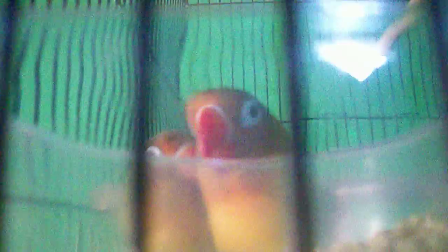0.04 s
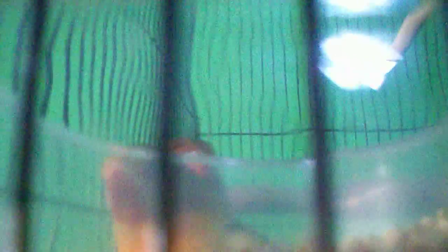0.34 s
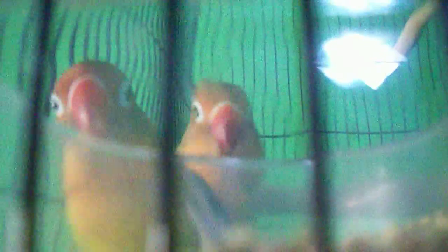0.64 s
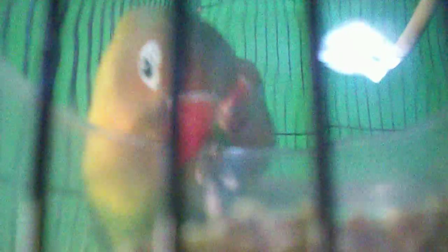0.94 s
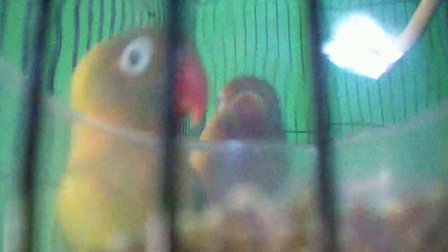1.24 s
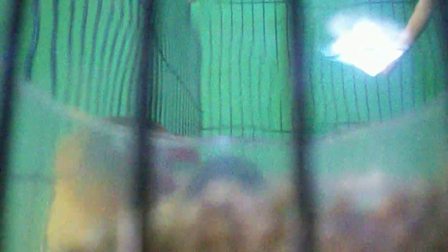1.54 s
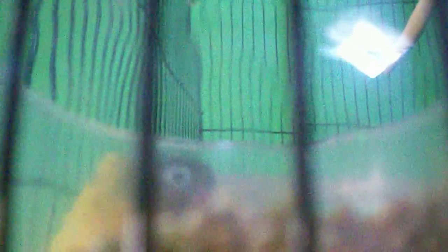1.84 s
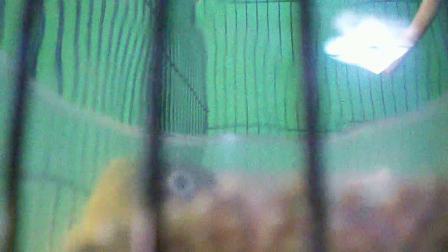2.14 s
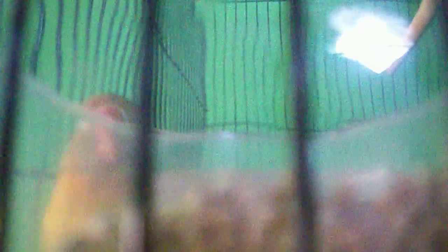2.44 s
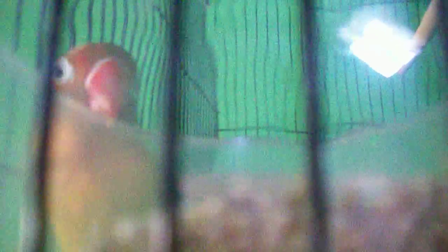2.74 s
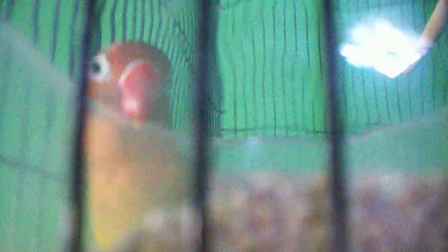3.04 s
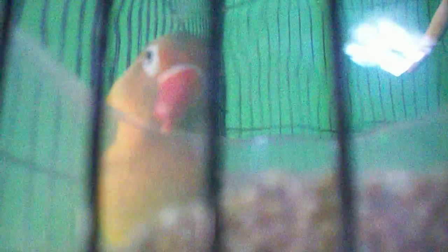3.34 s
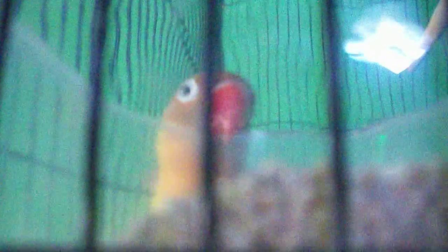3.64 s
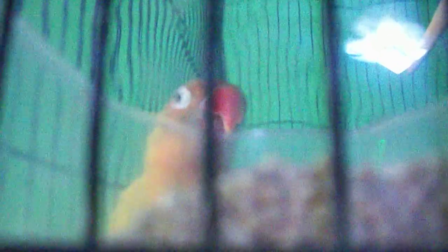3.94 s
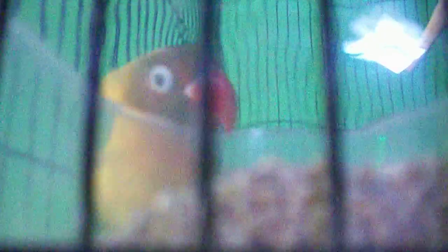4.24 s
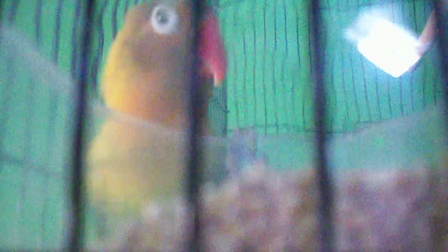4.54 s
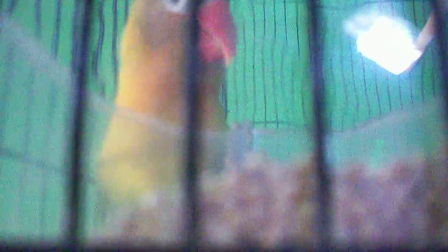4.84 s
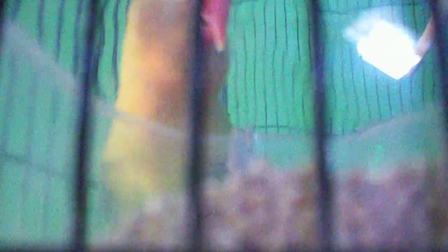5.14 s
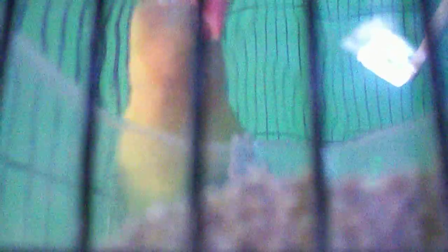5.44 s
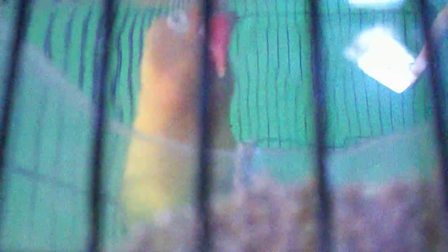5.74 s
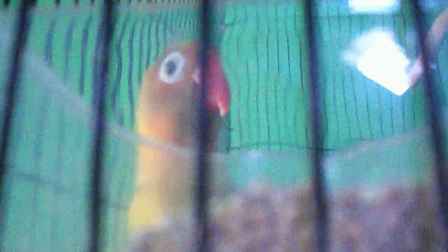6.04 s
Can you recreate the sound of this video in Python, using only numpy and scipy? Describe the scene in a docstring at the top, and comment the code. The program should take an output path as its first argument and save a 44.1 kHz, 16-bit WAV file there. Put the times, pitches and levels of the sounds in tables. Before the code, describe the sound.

Small caged parrots give shrill, falling chirps and crack seed husks close by, over a low throbbing fan hum.

```python
"""Lovebirds feeding in a wire cage

Close up, in a small hard-walled room. Shrill chirps, the second harmonic of the syrinx, leap up
and slide down; one squeak sounds at the bars, softer peeps further back. Beaks crack and nibble
husks, which ring briefly; seed, feet and feathers make friction noise.
Underneath, a fan throbs and hums, and dull rumbles swell and pass."""
import sys
import numpy as np
from scipy import signal
from scipy.fft import rfft, irfft
from scipy.io import wavfile
from scipy.ndimage import uniform_filter1d

SR = 44100
rng = np.random.default_rng(int(sys.argv[2]) if len(sys.argv) > 2 else 0)


def dump(signal):
    """Clip the signal to [-1, 1] and save it as 16-bit WAV at the path in sys.argv[1]."""
    limited = np.clip(np.atleast_2d(signal).T, -1, 1)
    pcm = np.round(limited * 32767).astype(np.int16)
    wavfile.write(sys.argv[1], SR, pcm)


N = 268128
T = np.arange(N) / SR

# echoes off cage and dish: delay/s, relative level/dB
CAGE_ECHOES = [(.00132, -28.5), (.0047, -8.5), (.0083, -6.5)]
# room air spectrum: f/Hz, relative density/dB
AIR_SPECTRUM = [(22, -21.5), (38, -4), (56, -14), (75, -11), (134, -18.5), (232, -29), (350, -29.5),
                (420, -33), (1200, -42.5), (3770, -42.5), (6100, -49), (7490, -61), (8400, -64.5),
                (9000, -78.5), (11700, -101), (19800, -120)]
# fan throb envelope: t/s, level/dB
THROB_LEVELS = [(0.0, -29.5), (0.12, -31), (0.9, -36), (3.06, -29.5), (4.54, -30), (5.32, -37), (5.33, -31),
                (6.08, -37.5)]
# fan throb partials: multiple of the throb rate, relative level/dB
THROB_PARTIALS = [(1, 5), (1.902, -15.5)]
# low swells: t/s, length/s, centre/Hz, width/Hz, level/dB
RUMBLE_SWELLS = [(0, 0.79, 311, 68, -59.5), (0.681, 0.61, 49.7, 5, -42.5),
                 (4.683, 0.77, 101.2, 13.4, -48.5), (5.207, 1, 45.7, 6.6, -42)]
# how busy the birds are: t/s, relative level/dB
ACTIVITY = [(0.0, -65.5), (0.34, -71), (0.66, -71.5), (0.98, -69.5), (1.3, -68), (1.61, -79), (1.81, -72),
            (1.96, -72.5), (2.57, -70), (2.81, -80), (3.33, -71), (3.57, -69), (3.94, -75.5), (4.18, -74.5),
            (4.27, -71.5), (5.18, -77.5), (5.52, -69.5), (6.08, -74.5)]
# feather and husk rustle spectrum: f/Hz, relative density/dB
RUSTLE_SPECTRUM = [(1500, -4), (3000, -12), (4500, -1.5), (6800, -1), (7800, -3), (9000, -22)]
# stirs of seed and feet: t/s, t60/s, centre/Hz, level/dB
SEED_SCUFFS = [(.071, 1, 1520, -61.5), (1.312, 0.82, 1350, -55.5), (1.79, 0.16, 810, -57),
               (2.649, 0.73, 860, -50.5), (2.649, 0.44, 220, -48.5), (2.815, 0.082, 298, -42),
               (3.331, 0.9, 2320, -59), (3.517, .33, 4060, -49.5), (3.586, 1, 1530, -56),
               (3.62, 1, 600, -55.5), (3.72, 0.26, 1700, -54.5), (4.606, 0.74, 720, -47),
               (4.607, 1, 2120, -54.5), (4.8, .17, 1000, -52), (4.899, 0.2, 4100, -52),
               (5.328, 0.27, 1590, -51.5), (5.49, 0.71, 1970, -51), (6.024, 0.092, 1700, -50.5)]
# feather flicks: t/s, t60/s, level/dB
FEATHER_FLICKS = [(.217, .15, -46), (0.404, .15, -56), (.542, 0.24, -48), (0.644, 0.37, -54.5),
                  (1.42, 0.24, -48), (1.55, 0.1, -43.5), (2.023, 0.56, -51.5), (2.967, 0.71, -53),
                  (3.43, 0.15, -51), (4.142, 0.51, -49.5), (5.764, .17, -45.5), (5.946, 1, -48.5)]
# husk modes: f/Hz, t60/s, relative level/dB
HUSK_MODES = [(2805, 0.0048, -4), (3650, 0.0052, -7), (3970, 0.021, -14), (4970, 0.011, -2.5),
              (6200, 0.0099, 0), (7080, 0.0017, 7), (7880, 0.005, -1)]
# beak and perch modes: multiple of the knock pitch, t60/s, relative level/dB
BEAK_MODES = [(.56, 0.0049, -1), (0.798, 0.02, 0), (1.002, 0.018, 5.5), (1.399, 0.013, 1)]
# husks cracking: t/s, knock pitch/Hz, knock level/dB, snap level/dB
SEED_CRACKS = [(0.0665, 1680, -26.5, -29.5), (0.1068, 1720, -39, -49), (.1445, 1490, -38, -38),
               (0.721, 1720, -49, -34.5), (1.248, 1720, -32, -23.5), (1.3103, 1290, -28.5, -21.5),
               (1.331, 1540, -38, -28.5), (2.714, 1805, -25, -14), (2.7628, 1623, -37, -35),
               (2.8177, 1490, -36.5, -29), (3.262, 1280, -40, -33), (3.586, 1830, -35, -32),
               (3.77, 1700, -40.5, -48.5), (4.1846, 1820, -30.5, -19.5), (4.257, 1750, -42.5, -47),
               (4.421, 1700, -44, -37.5), (5.9489, 1730, -33.5, -32.5), (6.052, 1700, -50, -29.5)]
# distant peeps: t/s, length/s, start pitch/Hz, level/dB
PEEP_CALLS = [(0.217, 0.028, 6400, -48.5), (.409, 0.01, 6980, -47), (0.542, 0.018, 6200, -48),
              (1.842, 0.36, 5940, -64.5), (2.301, 0.011, 3300, -50.5), (2.639, 0.036, 6810, -48),
              (3.069, 0.049, 5800, -53.5), (3.279, 0.023, 6280, -45.5), (3.49, 0.059, 5600, -53.5),
              (3.641, 0.04, 4900, -59), (3.874, 0.14, 5790, -62), (4.879, 0.035, 5050, -57),
              (4.901, 0.011, 7400, -50), (5.226, 0.033, 6070, -42.5), (5.521, 0.051, 6500, -47),
              (5.781, .06, 7200, -48), (5.831, 0.037, 6400, -47.5)]
# two joined squeak notes: t/s, length/s, start pitch/Hz, end pitch/Hz, level/dB
SQUEAK_NOTES = [(2.082, 0.009, 3274, 3860, -22), (2.0887, 0.018, 3485, 3350, -23)]
# chirps: t/s, time to slide/s, slide/s, top/Hz, end/Hz, level/dB, pre-slide gain/dB, slide fade/dB
CHIRP_CALLS = [(0.79, 0.031, 0.1, 6765, 3586, -33, -8, -19),
               (1.045, 0.013, 0.07, 7230, 3945, -31, -5, -17.5),
               (2.336, .025, .153, 6650, 3358, -27, -8, -20.5),
               (4.148, 0.024, 0.039, 5355, 4080, -38, 0, -10),
               (4.175, .018, 0.079, 6990, 4130, -28, -1, -20.5),
               (5.323, 0.015, 0.072, 6834, 3520, -25, -6, -22.5),
               (5.624, .022, 0.12, 6930, 3500, -25.5, -4, -20.5)]


def undb(db):
    """Decibels to gain."""
    return 10 ** (np.asarray(db) / 20)


def unit(x):
    """Scale to rms 1."""
    return x / np.sqrt(np.mean(x ** 2))


def decay(t, t60_s):
    """Exponential fall, 60 dB in t60_s."""
    return np.exp(-np.log(1000) * t / t60_s)


def curve(rows):
    """Straight lines through (t/s, value) points."""
    times_s, values = np.transpose(rows)
    return np.interp(T, times_s, values)


def walk(rate_hz):
    """Smooth random drift, rms 1."""
    span = int(SR / rate_hz)
    return unit(uniform_filter1d(uniform_filter1d(rng.standard_normal(N), span), span))


def add(out, start_s, x):
    """Mix x in at start_s."""
    i = int(start_s * SR)
    out[i:i + len(x)] += x[:max(N - i, 0)]


def coloured_noise(spectrum):
    """Noise shaped by (f/Hz, level/dB) points, rms 1."""
    hz, db = np.transpose(spectrum)
    bins_hz = np.maximum(np.fft.rfftfreq(N, 1 / SR), 1)
    gain = undb(np.interp(np.log(bins_hz), np.log(hz), db))
    return unit(irfft(rfft(rng.standard_normal(N)) * gain, N))


def band_noise(size, hz, width_hz):
    """Noise passed twice through one resonance, rms 1."""
    b, a = signal.iirpeak(hz, hz / width_hz, fs=SR)
    return unit(signal.lfilter(b, a, signal.lfilter(b, a, rng.standard_normal(size))))


def friction(t60_s, hz, width_hz, attack_s=0.0012):
    """Rubbing noise: fast attack, exponential decay."""
    t = T[:SR // 2]
    return band_noise(len(t), hz, width_hz) * (1 - np.exp(-t / attack_s)) * decay(t, t60_s)


def strike(force, modes, detune):
    """A force rings randomly detuned modes; peak 1."""
    t = T[:len(force)]
    hz, t60_s, db = np.transpose(modes)
    tuned_hz = hz * (1 + detune * rng.uniform(-0.96, 1, len(hz)))
    gains = undb(db) * (-1) ** np.arange(len(hz))
    ring = gains @ (np.sin(2 * np.pi * np.outer(tuned_hz, t)) * decay(t, t60_s[:, None]))
    sound = signal.fftconvolve(force, ring)[:len(t)]
    return sound / np.abs(sound).max()


def room(x, t60_s=0.46, first_s=0.0046, build_s=0.0038):
    """Dense wall echoes build up and fade; unit energy."""
    t = T[:SR * 3 // 4]
    build = np.clip((t - first_s) / build_s, 0, 1)
    tail = rng.standard_normal(len(t)) * build * decay(t, t60_s)
    return signal.fftconvolve(x, tail / np.linalg.norm(tail))[:N]


def cage(x):
    """Direct sound plus near echoes, which beat against a sliding whistle."""
    return x + sum(undb(db) * np.interp(T - delay_s, T, x, left=0) for delay_s, db in CAGE_ECHOES)


def fan(throb_hz=21.9, hum_hz=69, hum_db=-66, air_db=-45.5, drift=0.0113, flutter_db=0.5, waver_db=5):
    """Throb and hum drift with the fan's speed, over steady room air."""
    rad_per_hz = 2 * np.pi * np.cumsum(1 + drift * walk(4.9)) / SR
    throb = unit(sum(undb(db) * np.sin(k * throb_hz * rad_per_hz) for k, db in THROB_PARTIALS))
    hum = unit(np.sin(hum_hz * rad_per_hz) * undb(waver_db * walk(1.9)))
    air = coloured_noise(AIR_SPECTRUM)
    throb_db = curve(THROB_LEVELS) + flutter_db * walk(11)
    return throb * undb(throb_db) + hum * undb(hum_db) + air * undb(air_db)


def rumbles():
    """Low swells of noise somewhere in the house."""
    out = np.zeros(N)
    for start_s, length_s, hz, width_hz, db in RUMBLE_SWELLS:
        size = int(length_s * SR)
        add(out, start_s, undb(db) * band_noise(size, hz, width_hz) * np.sqrt(np.hanning(size)))
    return out


def rustle(gain_db=14, flutter_db=1.2):
    """Fine hiss of feathers and husks, following the birds' activity."""
    return coloured_noise(RUSTLE_SPECTRUM) * undb(curve(ACTIVITY) + gain_db + flutter_db * walk(32))


def scuffs(relative_width=0.82, grain_db=2.0):
    """Grainy friction of seed and feet; bright flicks of feathers."""
    out = np.zeros(N)
    for start_s, t60_s, hz, db in SEED_SCUFFS:
        add(out, start_s, undb(db) * friction(t60_s, hz, relative_width * hz))
    for start_s, t60_s, db in FEATHER_FLICKS:
        add(out, start_s, undb(db) * friction(t60_s, hz=7010, width_hz=2000))
    return out * unit(undb(grain_db * walk(150)))


def nibbles(rate_hz=11, gain_db=31, range_db=5):
    """Faint random beak ticks on husks, louder when the birds are busy."""
    out, blow = np.zeros(N), signal.unit_impulse(SR // 50)
    for when, size in rng.random((int(rate_hz * T[-1]), 2)):
        tick = strike(blow, HUSK_MODES, detune=0.05)
        add(out, when * T[-1], undb(gain_db + range_db * size) * tick)
    return out * undb(curve(ACTIVITY))


def cracks(splinter_db=-19, splinter_s=0.0024):
    """One blow knocks the beak while the husk snaps and splinters."""
    out, t = np.zeros(N), T[:SR // 25]
    blow = signal.unit_impulse(len(t))
    for start_s, knock_hz, knock_db, snap_db in SEED_CRACKS:
        splinters = undb(splinter_db) * rng.standard_normal(len(t)) * np.exp(-t / splinter_s)
        beak = [(multiple * knock_hz, t60_s, db) for multiple, t60_s, db in BEAK_MODES]
        add(out, start_s, undb(knock_db) * strike(blow, beak, detune=0.068))
        add(out, start_s, undb(snap_db) * strike(blow + splinters, HUSK_MODES, detune=0.084))
    return out


def peeps(fall_oct_per_s=13.0, max_fall_oct=0.71, waver=0.05, flutter_db=5.0):
    """Hoarse falling whistles; longer ones fall further, up to a limit."""
    out, wobble, flutter = np.zeros(N), 1 + waver * walk(600), undb(flutter_db * walk(350))
    for start_s, length_s, start_hz, db in PEEP_CALLS:
        progress = np.linspace(0, 1, int(length_s * SR))
        fall_oct = min(fall_oct_per_s * length_s, max_fall_oct)
        hz = start_hz * 2 ** (-fall_oct * progress) * wobble[int(start_s * SR):][:len(progress)]
        envelope = np.sqrt(np.minimum(1, 8 * progress) * (1 - progress))
        add(out, start_s, undb(db) * np.sqrt(2) * envelope * np.sin(2 * np.pi * np.cumsum(hz) / SR))
    return out * flutter


def squeak(second_db=-2, third_db=-30, attack_share=0.25, release_share=0.31):
    """Two clean notes, up then down, with a strong octave."""
    out = np.zeros(N)
    for start_s, length_s, start_hz, end_hz, db in SQUEAK_NOTES:
        progress = np.linspace(0, 1, int(length_s * SR))
        phase = 2 * np.pi * np.cumsum(start_hz + (end_hz - start_hz) * progress) / SR
        tone = np.sin(phase) + undb(second_db) * np.sin(2 * phase) + undb(third_db) * np.sin(3 * phase)
        envelope = np.clip(np.minimum(progress / attack_share, (1 - progress) / release_share), 0, 1)
        add(out, start_s, undb(db) * tone * envelope)
    return out


def chirps(waver=0.018, flutter_db=3.5, rasp_rad=0.0425, fundamental_db=-46.5, third_db=-42):
    """The syrinx leaps, holds, then slides down in steps; the beak passes its second harmonic."""
    leap_s, leap_from, onset_db = 0.012, 0.53, -9
    edge_s, swell_s = 0.003, 0.0021
    step_hz, step_depth, step_dip_db = 50.3, 0.8, -2.5
    bend, even_fade_s = 2.05, 0.086  # pitch falls fast at first; shorter slides fade earlier
    out, wobble, flicker_db = np.zeros(N), 1 + waver * walk(380), flutter_db * walk(150)
    jitter_rad = rasp_rad * walk(1400)
    longest_s = max(row[2] for row in CHIRP_CALLS)
    for start_s, hold_s, slide_s, top_hz, end_hz, level_db, soft_db, fade_db in CHIRP_CALLS:
        end_s = start_s + hold_s + slide_s
        gate = np.clip(1 + np.minimum(T - start_s, end_s - T) / edge_s, 0, 1)
        live = gate > 0
        t = T[live] - start_s
        leap_left = np.clip(1 - t / leap_s, 0, 1) ** 2
        progress = np.clip((t - hold_s) / slide_s, 0, 1)
        slide_rad = 2 * np.pi * step_hz * slide_s
        stepped = progress + step_depth * np.sin(slide_rad * progress) / slide_rad
        fallen = np.expm1(-bend * stepped) / np.expm1(-bend)
        hz = (top_hz + (end_hz - top_hz) * fallen) * (1 - (1 - leap_from) * leap_left)
        db = level_db + onset_db * leap_left + flicker_db[live]
        db += soft_db * np.clip(1 - (t - hold_s) / swell_s, 0, 1)  # opens as the slide begins
        db += fade_db * progress ** (slide_s / even_fade_s)
        db += step_dip_db * np.cos(slide_rad * progress) * np.clip(step_hz * (t - hold_s), 0, 1)
        phase = np.pi * np.cumsum(hz * wobble[live]) / SR + jitter_rad[live]  # fundamental: hz / 2
        whistle = undb(db) * (np.sin(2 * phase) + undb(third_db) * np.sin(3 * phase))
        # the fundamental shows only in the high part of long calls
        leak = undb(fundamental_db) * slide_s / longest_s * (hz / top_hz) ** 5.1
        out[live] += np.sqrt(2) * gate[live] * (whistle + leak * np.sin(phase))
    return out


def scene():
    """Mono mix; nearer sources carry less room."""
    calls, near, far, seeds = chirps(), squeak(), peeps(), cracks() + nibbles()
    direct = undb(-0.54) * cage(calls) + undb(0.5) * near + cage(far) + undb(1) * seeds
    walls = room(undb(-3) * calls + undb(-17.5) * near + undb(-0.5) * far + undb(-11) * seeds)
    return (direct + walls + scuffs() + rustle() + rumbles() + fan())[None]


def record(dry, rolloff_hz=7900, cutoff_hz=8900):
    """Small narrow-band microphone: treble roll-off, then a steep cut."""
    soft = signal.sosfilt(signal.butter(6, rolloff_hz, fs=SR, output="sos"), dry)
    return signal.sosfilt(signal.ellip(8, 0.2, 70, cutoff_hz, fs=SR, output="sos"), soft)


dry = scene()
out = record(dry)
dump(out)
```